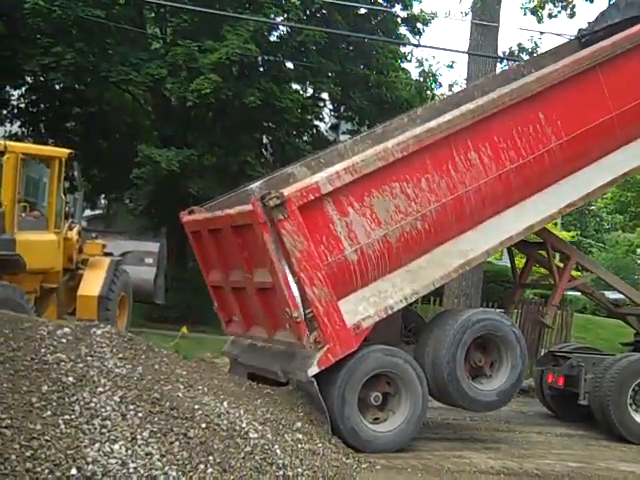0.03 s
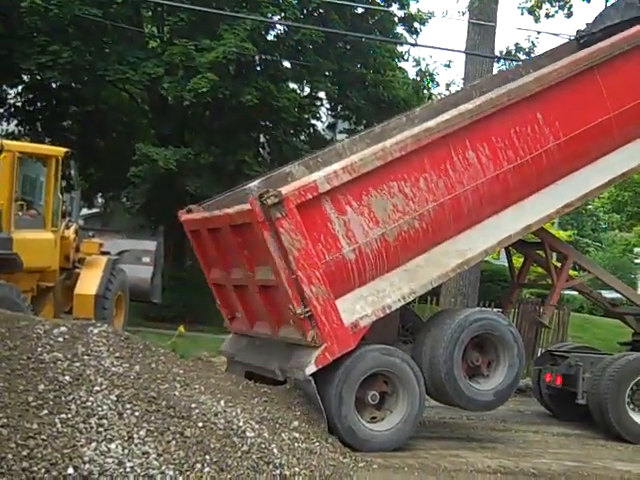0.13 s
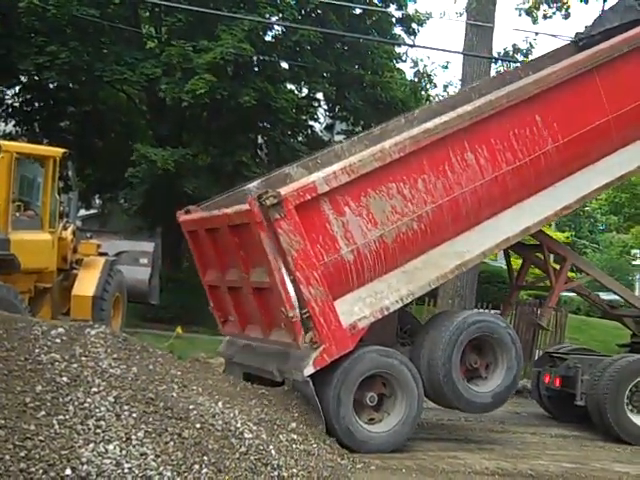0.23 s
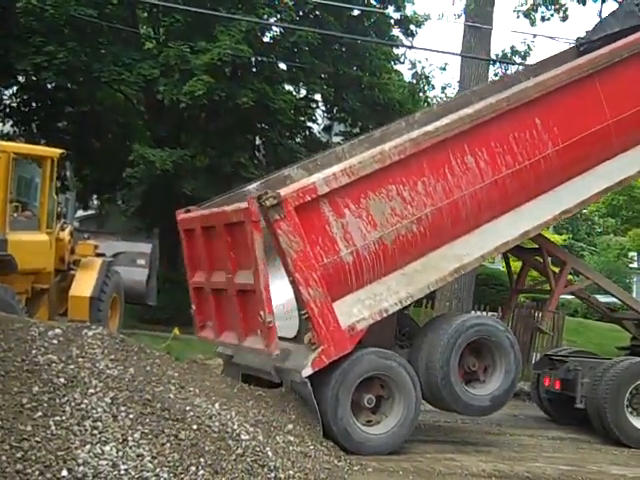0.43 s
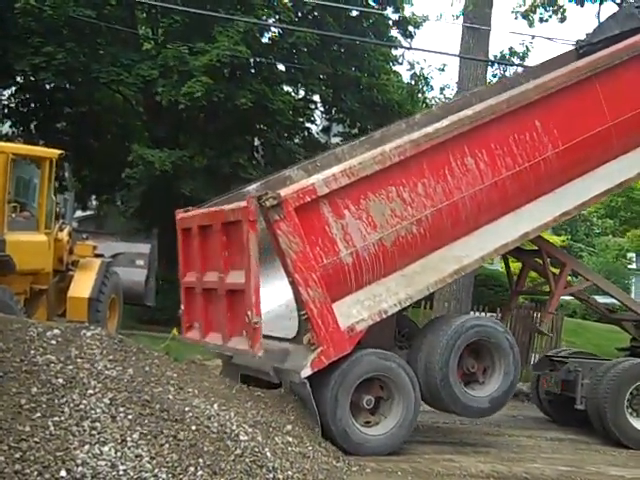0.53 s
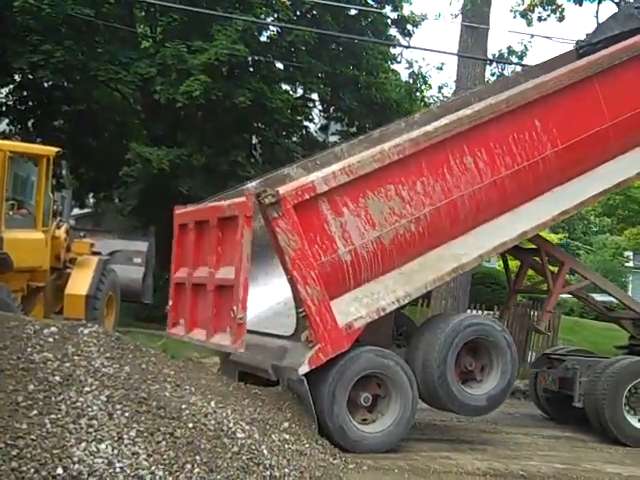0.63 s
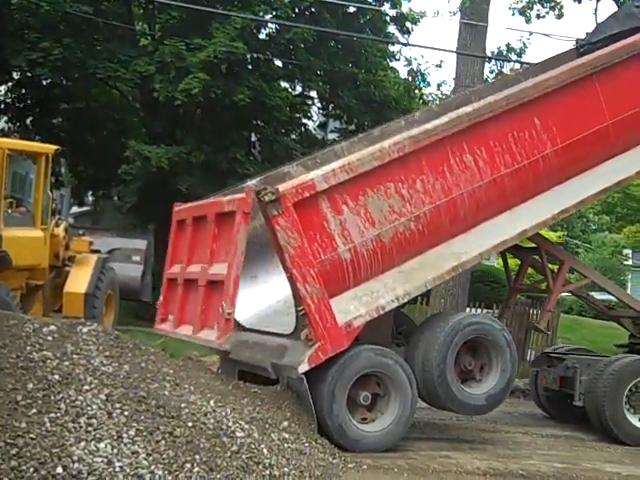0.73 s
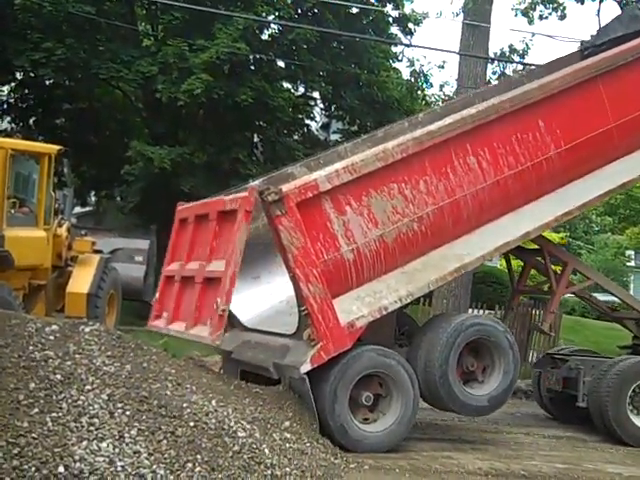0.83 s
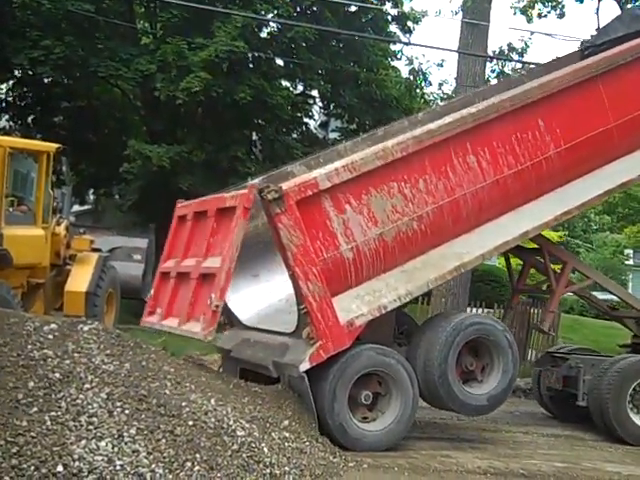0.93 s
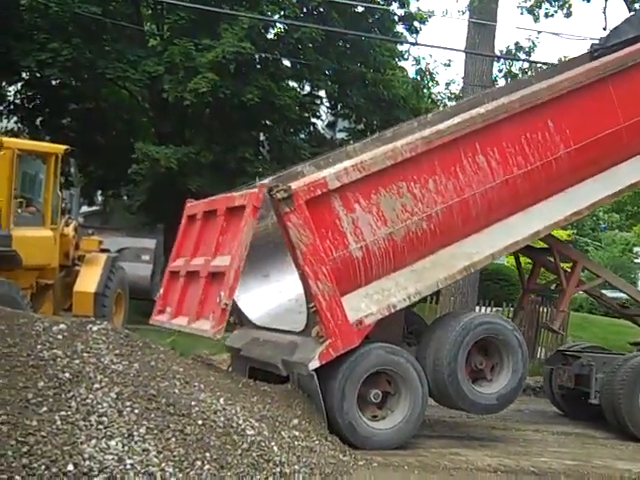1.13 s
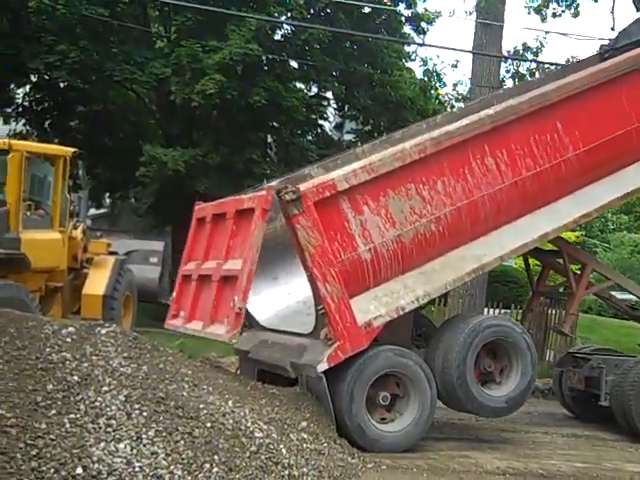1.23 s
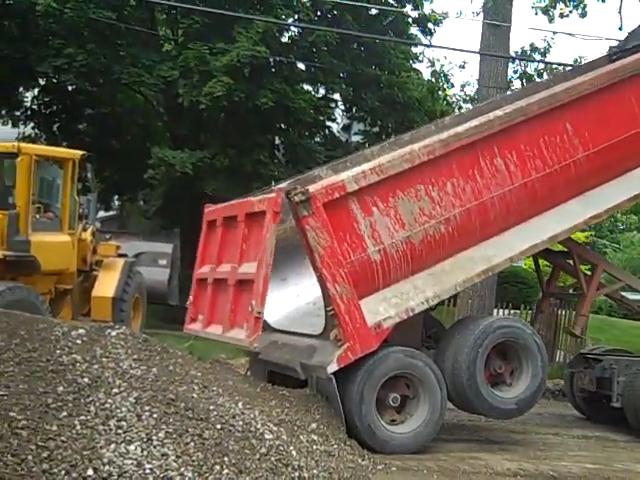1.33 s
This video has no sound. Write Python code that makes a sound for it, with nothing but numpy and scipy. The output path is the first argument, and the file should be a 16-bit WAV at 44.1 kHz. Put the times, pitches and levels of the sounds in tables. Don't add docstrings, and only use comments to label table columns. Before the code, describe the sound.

Outdoors at a gravel pile, a diesel idles and chatters; a huge metal bang bursts out, overloading the camera microphone, its gain dipping, followed by booming panels, a brief squeak, and a light chain knock and jingle.

```python
import sys
import numpy as np
from scipy import signal
from scipy.fft import rfft, irfft, next_fast_len
from scipy.io import wavfile
from scipy.ndimage import uniform_filter1d, map_coordinates

SR = 44100
rng = np.random.default_rng(int(sys.argv[2]) if len(sys.argv) > 2 else 0)


def level_to_linear(level):
    exponent = np.asarray(level, float) / 20
    return 10 ** exponent


def dump_mix(stems):
    frames = np.atleast_2d(stems).T
    limited = np.clip(frames, -1, 1)
    pcm = np.round(limited * 32767).astype(np.int16)
    wavfile.write(sys.argv[1], SR, pcm)


N = 61739

# frequency in Hz, likeness from 0 to 1.
LIKENESS = [(60, 0.98), (300, 1), (2000, 0.94), (5000, 0.46), (12000, 0.35)]
# frequency in Hz, lead in radians.
LEFT_LEAD = [(0, 3), (2670, -1), (4910, -3), (7240, -2.5), (10900, -4.5), (14300, 1.5)]
# frequency in Hz, difference in dB.
YARD_PAN = [(60, 0), (240, -1.5), (920, -0.5), (3610, -3.5), (14100, 12)]
BANG_PAN = [(60, -9), (240, -1), (920, -0.5), (3610, -1.5), (14100, 10.5)]

# frequency in Hz, level in dB per Hz.
ENGINE_HISS = [(15, -39), (25, -14), (70, -5.5), (130, -5.5), (596, -19), (1730, -15.5), (1980, -12.5),
               (2950, -20.5), (6380, -16.5), (14600, -55)]
# time in seconds, level in dB.
FIRING_LOAD = [(0.0, -36), (0.018, -33), (0.268, -37.5), (0.292, -28), (0.432, -32), (0.552, -19.5),
               (0.614, -39), (0.658, -27), (0.774, -45), (0.816, -27), (0.864, -28), (0.906, -39),
               (0.96, -30), (1.078, -42.5), (1.252, -30), (1.32, -41), (1.358, -31.5), (1.4, -27)]
# multiple of the firing rate, level in dB.
FIRING_TONES = [(1, 1.5), (2, -58), (3, -51), (4, -53), (5, -42.5), (6, -51)]
# frequency in Hz, width in Hz, level in dB.
HOUSING = [(838, 290, -36.5), (2480, 250, -41), (3300, 300, -43), (6400, 490, -39.5), (7850, 1160, -40),
           (11100, 6600, -53)]
# start in seconds, peak in dB.
CHATTER_KNOCKS = [(0.008, -30), (0.024, -35), (0.053, -24.5), (.068, -31), (0.082, -33), (0.098, -30),
                  (0.116, -32), (0.132, -27), (0.151, -25), (.17, -31), (.188, -26.5),
                  (0.5494, -43), (0.5698, -43.5), (0.5848, -31), (0.6102, -24), (0.6586, -44), (0.693, -18),
                (0.7207, -21), (0.781, -22.5), (0.806, -21.5), (0.8515, -26), (0.883, -13.5), (0.915, -34),
                (0.9629, -24), (0.976, -19.5), (1.001, -19), (1.0393, -21.5), (1.053, -34), (1.0697, -23),
                (1.086, -31), (1.1435, -42), (1.1653, -37), (1.1795, -20.5), (1.191, -26), (1.2219, -19),
                (1.238, -28), (1.254, -21.5), (1.268, -24), (1.283, -46), (1.3171, -41), (1.338, -28),
                (1.3475, -27), (1.363, -21.5), (1.38, -29), (1.392, -26)]

# start in seconds, frequency in Hz, level in dB, 60 dB decay in seconds.
LINKS = [(1.029, 6000, -21.5, 0.096), (1.034, 11300, -55, 0.34), (1.045, 6300, -33, 0.066),
         (1.05, 4960, -32, 0.23), (1.058, 10100, -55, 0.21), (1.064, 4190, -26.5, 0.26),
         (1.077, 6000, -34, 0.069), (1.079, 4200, -33, 0.14), (1.105, 6000, -23, 0.097),
         (1.121, 3190, -38, 0.18), (1.14, 4240, -46, 0.1), (1.203, 6400, -20, 0.043)]
# frequency in Hz, level in dB, 60 dB decay in seconds.
KNOCK = [(790, 0, .06), (950, -4, .09), (1330, 1, .05), (1560, -2, .04), (1800, 0, .04), (2250, -3, .04)]

# start in seconds, peak in dB.
SLIPS = [(0.538, -17), (0.5375, -10.5), (0.5579, -13.5), (0.5636, -12), (0.5636, -11), (0.58, -24),
         (0.587, -26), (0.594, -24), (0.594, -15.5), (0.5974, -22), (0.604, -16), (0.604, -10),
         (0.6118, -16), (0.6164, -21), (0.6197, -20), (0.6284, -23), (0.632, -23), (0.636, -16),
         (0.6393, -26)]
# start in seconds, level in dB.
SCRAPE = [
    (.588, -20),
    (.607, -19),
    (.627, -26),
]
# frequency in Hz, width in Hz, level in dB.
HINGE_LEFT = [(6300, 600, -13), (7330, 450, 7), (7980, 480, 2)]
HINGE_RIGHT = [(5330, 400, -34), (6400, 320, -3), (7900, 530, -22)]
# frequency in Hz, width in Hz, level in dB.
PIN = [(3540, 1000, -12.5), (5360, 1500, -30)]

# time after the slam in seconds, level in dB.
BLOWS = [
    (0, 5.5),
    (.006, -36),
    (.011, -16),
    (.017, -24),
    (0.024, -44),
]
# frequency in Hz, level in dB per Hz.
CRACK = [(290, -12), (500, -2.5), (1550, -9.5), (2760, -2), (4650, -7.5), (6250, -1.5), (7400, -5.5),
         (9950, -6), (14600, -22)]
# frequency in Hz, 60 dB decay in seconds.
CRACK_T60 = [(100, 0.15), (400, 0.14), (1500, 0.065), (4000, 0.068), (8000, 0.058), (14000, 0.014)]
# frequency in Hz, level in dB per Hz.
BOOM = [(18, -51), (40, -20.5), (150, -5.5), (250, -7.5), (430, -7.5), (590, -16.5), (850, -11),
        (1500, -25), (5000, -66)]
# frequency in Hz, 60 dB decay in seconds.
BOOM_T60 = [(50, 2.62), (150, 1.54), (400, 1.59), (600, 1.36), (850, 1.38), (2500, 1.35)]
# frequency in Hz, level in dB per Hz.
SIZZLE = [(700, -44), (1200, 7.5), (6500, 1), (9000, -7.5), (12500, -35), (14500, -40)]
# frequency in Hz, 60 dB decay in seconds.
SIZZLE_T60 = [(1000, 0.46), (6000, 0.47), (12000, 0.56)]
# frequency in Hz, level in dB, 60 dB decay in seconds.
PANELS = [(63.3, -7, 0.7), (114.2, -3, 0.89), (126.2, -1.5, 1.25), (151.5, -7, 1.6), (281.4, -15.5, 6.1),
          (358, -6.5, 1.6), (373.5, 3.5, 0.58), (410.3, -5, 1.62), (433, -14, 2.1), (456, -20, 0.48),
          (729.5, -3, 0.52)]
# frequency in Hz, level in dB, 60 dB decay in seconds.
EDGE = [(48, -16, 0.79), (171.5, 4.5, 0.095), (254.3, -3, 0.11), (423.6, 2, 0.094), (506.5, -3.5, 0.1),
        (714, -15, 0.26), (827, -18, 0.39), (1030, -18, 0.38), (1558, -5, 0.068), (2416, -27, 0.029),
        (6730, -7, 0.073)]
# start in seconds, level in dB.
SHUDDERS = [
    (.53, -5),
    (.62, -14),
    (.722, -6),
    (.775, -17),
    (.83, -20),
    (1.08, -2),
]
# start in seconds, frequency in Hz, level in dB, 60 dB decay in seconds.
REBOUNDS = [(.262, 116, -7.5, 0.63), (0.279, 196.6, -6.5, 0.52), (0.334, 440.6, -9, 0.26),
            (0.369, 156.2, -4.5, 0.44), (.41, 374, -8.5, 0.2), (.43, 149, -14, 0.54), (.46, 152, -12, 0.28),
            (.46, 453, -12, 0.34), (.505, 339.7, -15.5, 0.58), (.53, 155.8, -6.5, 0.48),
            (.535, 204.8, -10.5, 0.25), (0.563, 170.7, -12, 0.34), (.6, 196.8, -12.5, 0.48),
            (.608, 283, -17, 0.18), (.615, 153.6, -11, 0.35), (.655, 451.3, -19, 0.48),
            (.725, 148.8, -15, 0.36), (.73, 239.6, -12.5, 0.23), (.75, 121.8, -18, 0.54),
            (.77, 310.6, -21, 0.68), (.78, 191.3, -16.5, 0.44), (.9, 261, -21, 0.37),
            (1.075, 103.6, -19.5, 0.31), (1.14, 350.5, -25, 0.36)]

# middle in seconds, half length in seconds.
DULLED = [
    (.541, .005),
    (.602, .046),
]

BANG_S, LEAD_S, LEAD_DB = 0.2155, 0.00064, -8
CRACK_DB, BOOM_DB, PANEL_DB, EDGE_DB, SIZZLE_DB = 5, -7, -11.5, 4.5, -7
EDGE_RISE_S, REBOUND_RISE_S, SHUDDER_S = 0.0025, 0.015, 0.022
BANG_TURN = 0.15
ENGINE_DB, FIRING_HZ, FIRING_DB = -25, 66.08, 3.5
GATE, SHAKE = 0.15, 0.99
AIR_TOP_HZ = 14100
CHATTER_HZ, CHATTER_WIDE_HZ, CHATTER_S, CHATTER_BED_DB = 1972, 67.5, 0.0089, -36
LEFT_DB = -2
SLIP_S, HINGE_DB, HINGE_TOP_HZ = 0.0014, 13, 8500
KNOCK_S, KNOCK_DB, JINGLE_DB = 1.024, -21, -31.5
DUCK_DB, DUCK_S, HOLD_S, RECOVER_S = 8.5, 0.029, 0.24, 0.16
REST_DB = 1
CLIP_KNEE, DULLED_HZ = 12, 9300


def unit(x):
    return x / np.sqrt(np.mean(x ** 2) + 1e-20)


def along(points, hz):
    f, v = np.transpose(points)
    return np.interp(np.log(hz + 1), np.log(f + 1), v)


def wobble(rate):
    knots = rng.standard_normal(int(N * rate / SR) + 4)
    return map_coordinates(knots, [np.arange(N) * rate / SR])


def filtered(x, response):
    m = next_fast_len(N + SR // 2)
    return irfft(rfft(x, m) * response(np.fft.rfftfreq(m, 1 / SR)), m)[..., :N]


def peaks(table):
    def response(f):
        return sum((-1) ** k * level_to_linear(db) * 1j * f * width / (hz * hz - f * f + 1j * f * width)
                   for k, (hz, width, db) in enumerate(table))
    return response


def pair(turn=0, pan=YARD_PAN):
    def mid_side(hz):
        angle = np.arccos(np.clip(along(LIKENESS, hz), -1, 1)) / 2
        return np.array([np.cos(angle), np.sin(angle)])
    mid, side = filtered(rng.standard_normal((2, N)), mid_side)
    left = filtered(mid + side, lambda hz: np.exp(1j * turn * along(LEFT_LEAD, hz)))
    both = np.array([left, mid - side])
    return filtered(both, lambda hz: level_to_linear(along(pan, hz) / 2 * np.array([[1], [-1]])))


def bursts(rows, length_s):
    rows = np.array(rows)
    u = np.clip((np.arange(N) / SR - rows[:, :1]) / length_s, 0, None)
    return np.sum(level_to_linear(rows[:, 1:2]) * np.e * u * np.exp(-u), axis=0)


def dying(spectrum, t60):
    colour = unit(filtered(pair(BANG_TURN, BANG_PAN), lambda hz: level_to_linear(along(spectrum, hz))))
    hz, t, z = signal.stft(colour, SR, nperseg=128)
    fade = level_to_linear(-60 * t / along(t60, hz)[:, None])
    return signal.istft(z * fade, SR, nperseg=128)[1][:, :N]


def ring(modes, t, wander):
    return sum(level_to_linear(db - 60 * t / t60) * np.sin(2 * np.pi * hz * t + wander * wobble(12.13)[:len(t)])
               for hz, db, t60 in modes)


def loose_part(drive):
    swing = 2 * np.pi * np.cumsum(CHATTER_HZ + 22 * wobble(60)) / SR
    swing = swing + np.array([[along(LEFT_LEAD, CHATTER_HZ)], [0]])
    knocks = drive * level_to_linear(wobble(87.6) + np.array([[LEFT_DB], [0]])) * np.sin(swing)
    part = peaks([(CHATTER_HZ, CHATTER_WIDE_HZ * 1.63, 0)])
    bed = unit(filtered(pair(0.92), lambda f: part(f) ** 2))
    return knocks + level_to_linear(CHATTER_BED_DB) * bed


def engine():
    phase = 2 * np.pi * np.cumsum(FIRING_HZ * (1 + 0.0072 * wobble(8))) / SR
    load_db = np.interp(np.arange(N) / SR, *np.transpose(FIRING_LOAD))
    tones = 0
    for k, db in FIRING_TONES:
        sway_db = load_db if k == 1 else 3.2 * wobble(6.4)
        tones = tones + level_to_linear(db + sway_db) * np.sin(k * phase + k * k)
    tones = level_to_linear(FIRING_DB) * tones * level_to_linear(np.array([[LEFT_DB], [-LEFT_DB]]) / 2)

    drive = bursts(CHATTER_KNOCKS, CHATTER_S / 2)
    pulse = (1 + GATE * np.cos(phase)) * level_to_linear(0.7 * wobble(30)) * (1 + SHAKE * drive)
    air = level_to_linear(ENGINE_DB) * unit(filtered(pair(0.87) * pulse, lambda hz: level_to_linear(along(ENGINE_HISS, hz))))
    for hz, width, db in HOUSING:
        shell = peaks([(hz, width, 0)])
        hum = unit(filtered(pair(0.7) * pulse, lambda f: shell(f) ** 2))
        air = air + level_to_linear(db + 0.78 * wobble(24.04)) * hum
    air = filtered(air, lambda hz: 1 / (1 + (hz / AIR_TOP_HZ) ** 40))
    return tones + air + loose_part(drive)


def chain():
    links, t = np.zeros(2 * N), np.arange(SR // 4) / SR
    for s, hz, db, t60 in LINKS:
        link = ring([(hz, db, t60), (hz * 1.015, db - 12, t60)], t, wander=14.0)
        links[round(s * SR):][:len(t)] += link * (1 - np.exp(-t / 0.0034))
    since = np.clip(np.arange(N) / SR - KNOCK_S, 0, None)
    knock = level_to_linear(KNOCK_DB) * ring(KNOCK, since, wander=0.2) * (1 - np.exp(-since / 0.001))
    rustle = peaks([(1500, 2100, 12.3), (6000, 4300, 10.6), (10550, 3000, 2.5)])
    jingle = filtered(pair(0.96) * bursts([(KNOCK_S, JINGLE_DB)], 0.029), rustle)
    return knock + jingle + links[:N] * level_to_linear([[-1], [1]])


def hinge():
    grip = (bursts(SLIPS, SLIP_S / 2) + bursts(SCRAPE, 0.0038)) * level_to_linear(HINGE_DB)
    lowpass = signal.butter(8, HINGE_TOP_HZ, fs=SR, output="sos")
    slips = signal.sosfilt(lowpass, np.sign(rng.standard_normal(N)) * grip)
    squeak = np.array([filtered(slips, peaks(HINGE_LEFT)), filtered(slips, peaks(HINGE_RIGHT))])
    rub = pair() * uniform_filter1d(grip, size=200)
    return squeak + filtered(rub, lambda f: peaks(PIN)(f) * (f < HINGE_TOP_HZ))


def tailgate():
    out, t = np.zeros((2, 2 * N)), np.arange(N) / SR
    body = level_to_linear(BOOM_DB + 1.7 * wobble(26.15)) * dying(BOOM, BOOM_T60)
    body += level_to_linear(PANEL_DB) * ring(PANELS, t, wander=0.93)
    body += level_to_linear(SIZZLE_DB + wobble(90)) * dying(SIZZLE, SIZZLE_T60)
    body += level_to_linear(EDGE_DB) * ring(EDGE, t, wander=0.46)
    out[:, round(BANG_S * SR):][:, :N] += body * (1 - np.exp(-t / EDGE_RISE_S))
    out[:, :N] *= 1 + bursts(SHUDDERS, SHUDDER_S)
    for s, hz, db, t60 in REBOUNDS:
        tone = level_to_linear(db - 60 * t / t60) * np.sin(2 * np.pi * hz * t)
        out[:, round(s * SR):][:, :N] += tone * (1 - np.exp(-t / REBOUND_RISE_S))
    for after, db in BLOWS + [(-LEAD_S, LEAD_DB)]:
        crack = level_to_linear(CRACK_DB + db) * dying(CRACK, CRACK_T60)
        out[:, round((BANG_S + after) * SR):][:, :N] += crack * (1 - np.exp(-t / 0.00029))
    return out[:, :N]


def scene():
    return engine() + chain() + hinge() + tailgate()


def band_limit(x):
    return signal.sosfilt(signal.butter(12, 14720, fs=SR, output="sos"), x)


def record(dry):
    now = np.arange(N) / SR
    t = np.clip(now - BANG_S, 0, None)
    duck = (1 - np.exp(-t / DUCK_S)) / (1 + np.exp((t - HOLD_S - RECOVER_S) / (RECOVER_S / 2)))
    x = dry * level_to_linear(-DUCK_DB * duck - REST_DB * (t > 0))
    dulled = sum(np.exp(-((now - s) / half_s) ** 6) for s, half_s in DULLED)
    x = x - dulled * filtered(x, lambda hz: hz > DULLED_HZ)
    clipped = x / (1 + np.abs(x) ** CLIP_KNEE) ** (1 / CLIP_KNEE)
    return band_limit(clipped)


dry = scene()
out = record(dry)
dump_mix(out)
```